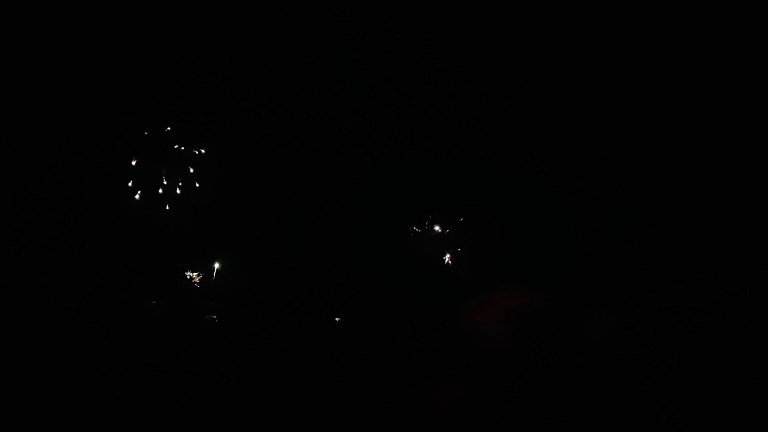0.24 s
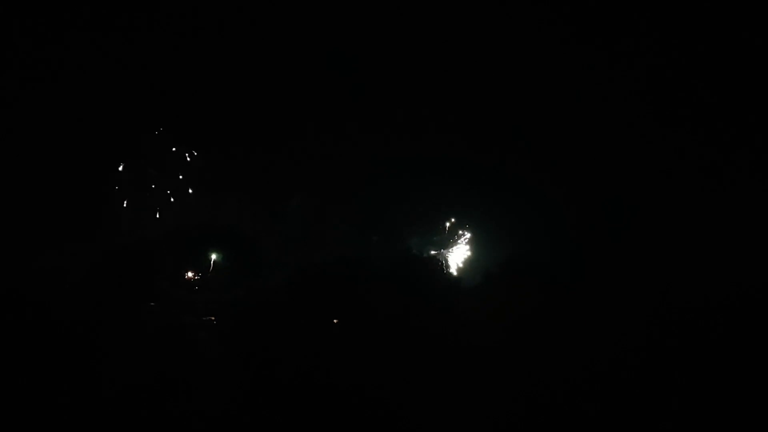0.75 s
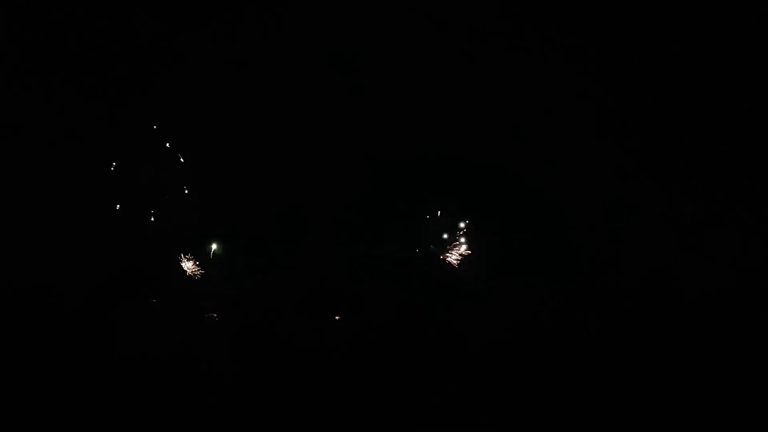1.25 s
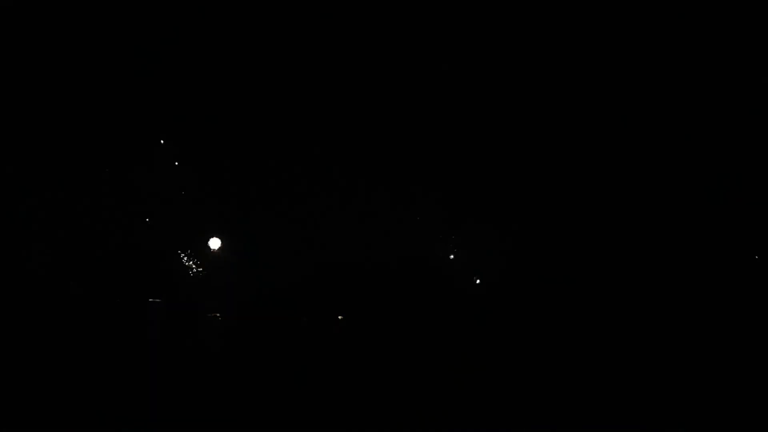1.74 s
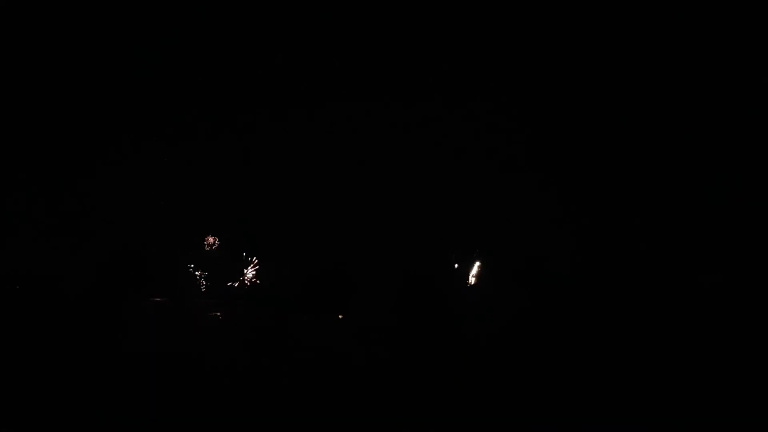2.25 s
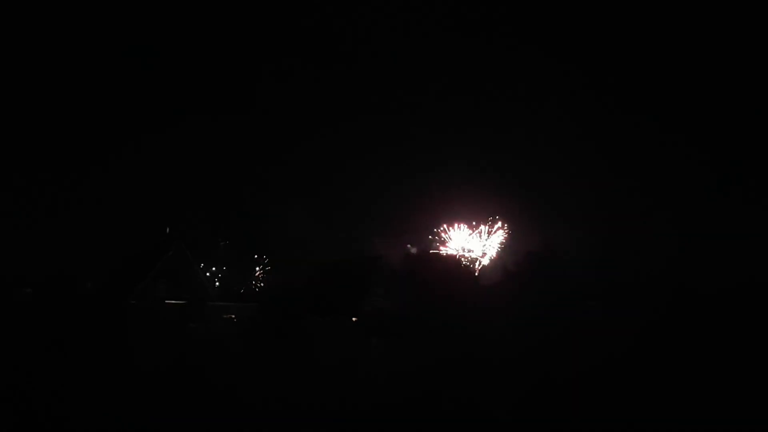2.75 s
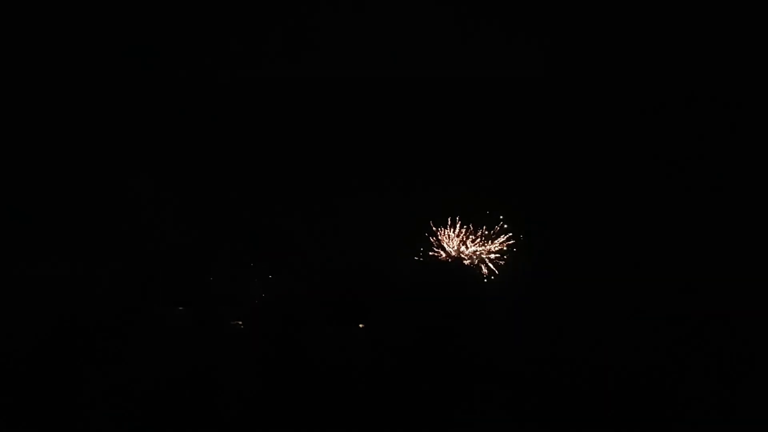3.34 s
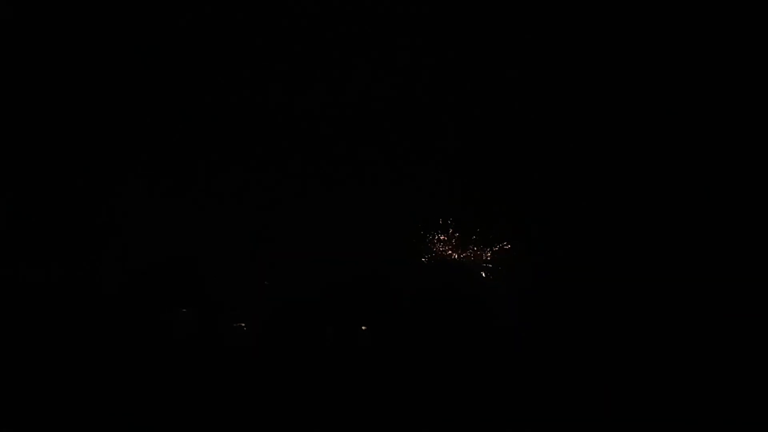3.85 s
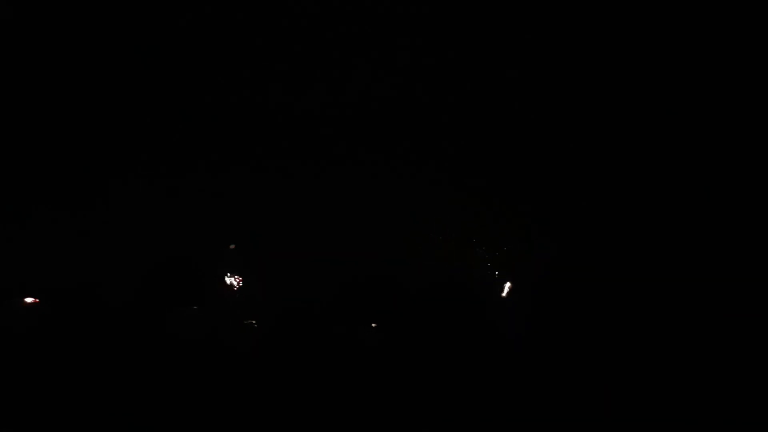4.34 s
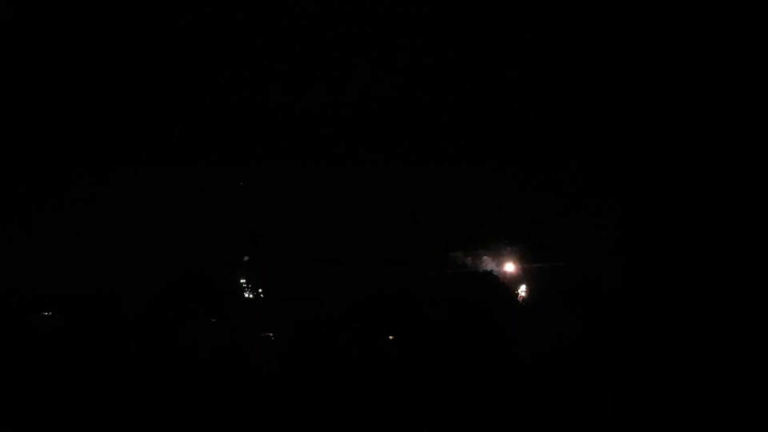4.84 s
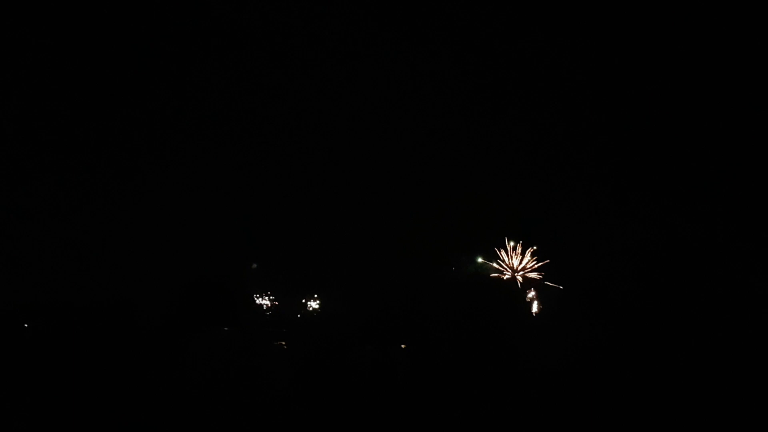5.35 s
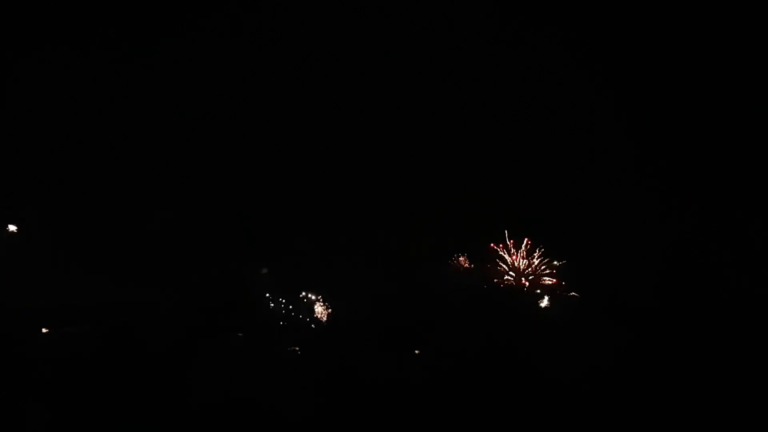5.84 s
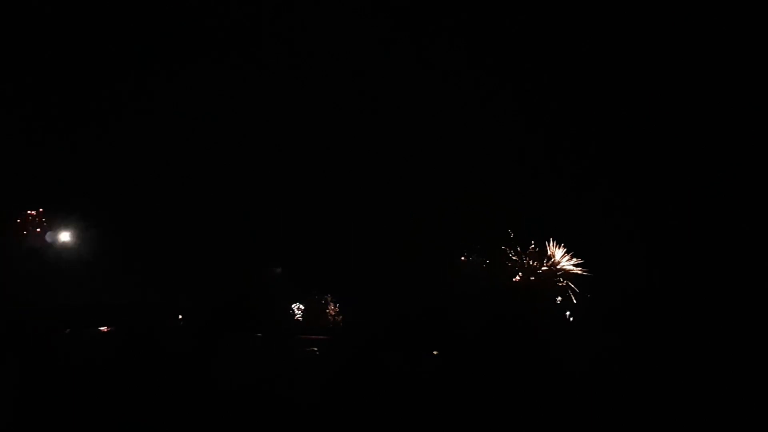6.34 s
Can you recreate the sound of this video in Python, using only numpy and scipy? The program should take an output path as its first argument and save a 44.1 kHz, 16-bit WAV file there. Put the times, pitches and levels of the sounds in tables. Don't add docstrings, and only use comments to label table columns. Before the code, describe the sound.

Fireworks and firecrackers go off all around a street at night, sharp overloading bangs slapping off houses over constant crackle and distant rumbling roar.

```python
import sys
import numpy as np
from scipy import signal
from scipy.fft import rfft, irfft, next_fast_len
from scipy.io import wavfile
from scipy.ndimage import map_coordinates

SR = 44100
rng = np.random.default_rng(int(sys.argv[2]) if len(sys.argv) > 2 else 0)


def generate_wav(sig):
    pcm = np.round(np.clip(np.atleast_2d(sig).T, -1, 1) * 32767).astype(np.int16)
    wavfile.write(sys.argv[1], SR, pcm)


def invert_db(x):
    u = np.asarray(x, float) / 20
    return 10 ** u


N = 290619

# t/s, peak level/dB, swing f/Hz, front level/dB re peak, left lag/ms
SHELLS = [(0.0142, -9.5, 440, -11, -0.44), (0.0895, -6, 400, -4.5, -0.16),
          (0.0994, -4.5, 408, -30.5, 0.037), (0.104, -1.5, 523, -6.5, 0.38), (0.4773, -20, 634, -20, 0.1),
          (1.1797, -4.5, 440, -4.5, -0.044), (1.2906, 1.4, 412, -16, 0.32), (1.7831, -8.5, 450, -18, -0.18),
          (2.0447, -15, 630, -5, -0.1), (2.3393, -0.2, 433, -15, 0.42), (2.8773, -24.5, 350, -4, 0.019),
          (3.2723, 2.5, 530, -5, 0.03), (3.395, -5.5, 514, -7, 0.044), (3.6844, -10, 117, -9.5, -0.083),
          (4.2065, -9, 350, -6.5, 0.38), (4.243, -8.5, 267, -10, 0.37), (4.5335, -11, 444, -8.5, 0.56),
          (4.8973, -16, 360, -12, 0.4), (5.3478, -7.5, 610, -24, 0.073), (5.7261, -3.5, 415, -1.5, 0.2),
          (5.9327, -8, 408, -5, -0.32), (6.0467, -8.5, 676, -16, 0.29), (6.4496, -9.5, 567, -10, 0.2),
          (6.5631, -11, 855, -6.5, 0.016)]
# t/s, peak level/dB, swing f/Hz, front level/dB re peak
WALL_SLAPS = [(0.152, -22, 480, -25), (1.1964, -26, 494, -11.5), (1.2093, -12.5, 506, -1.5),
              (1.2997, -17.5, 574, 3.5), (1.3226, -7.5, 650, -8.5), (1.3421, -9, 760, -8),
              (1.3558, -8, 460, -11), (1.8078, -24, 560, -8.5), (2.0737, -13.5, 547, -8),
              (2.3702, -8.5, 597, -16), (2.3759, -13, 392, -2), (2.4026, -8.5, 367, -4.5),
              (2.4102, -13.5, 520, -13.5), (2.4478, -14.5, 334, -0.5), (2.4695, -11.5, 455, -5.5),
              (2.495, -14, 470, -24.5), (2.5172, -13.5, 530, -21), (3.3189, -15.5, 587, -3),
              (3.3328, -9, 383, -2.5), (3.3414, -14, 460, -11), (3.4431, -16.5, 715, -1),
              (3.6942, -18, 197, -1), (4.227, -13.5, 504, -29), (5.361, -13.5, 494, -11),
              (5.7457, -19.5, 434, 5), (5.7653, -14, 494, -3), (5.7802, -9, 690, -21),
              (6.0658, -14.5, 535, -4.5), (6.4814, -13, 617, -17), (6.4955, -14.5, 505, -16)]
# t/s, peak level/dB, swing f/Hz, front level/dB re peak
CRACKERS = [(0.8439, -16, 573, -5.5), (0.9875, -25.5, 533, 5.5), (0.9924, -19.5, 670, -3),
            (1.0162, -23, 900, 1), (1.5207, -26, 496, -9), (1.7103, -18, 850, -11.5),
            (1.9451, -26.5, 370, -29), (1.986, -18.5, 644, -14), (2.158, -16.5, 580, -10),
            (2.2781, -14.5, 613, -7), (4.276, -23.5, 494, 4), (3.1783, -16, 735, -14),
            (3.221, -14, 695, -4), (3.234, -15.5, 850, -6), (3.2582, -19, 610, -21), (3.6, -22, 477, -14),
            (3.7688, -25.5, 520, -2.5), (4.473, -19, 295, -13), (4.4986, -19.5, 373, -4),
            (4.603, -19, 566, 1.5), (4.7994, -21, 885, -37), (5.181, -21.5, 361, -21),
            (5.2801, -16, 645, -9), (5.6453, -15.5, 315, -11), (5.6526, -20, 426, -4),
            (5.9789, -16.5, 577, -38), (6.1153, -23, 644, -3), (6.13, -23.5, 695, -11),
            (6.1882, -20.5, 415, -10), (6.3692, -19.5, 630, -11)]
# t/s, peak level/dB, swing f/Hz, front level/dB re peak
FAR_CRACKERS = [(0.033, -19, 476, -12), (0.1662, -18, 405, -7), (0.2222, -20.5, 414, -12),
                (0.2539, -26.5, 416, -12), (0.8269, -21, 626, -9), (0.9137, -21.9, 346, -8),
                (0.9383, -23, 339, -12), (1.409, -25, 437, -8), (1.4418, -27, 363, -11),
                (1.5553, -23.4, 518, -12.5), (1.5843, -28, 399, -11), (1.662, -33, 646, -11),
                (1.9221, -26.6, 757, -12), (1.9712, -22, 494, -10), (2.2061, -18, 695, -10),
                (2.2117, -22.5, 671, -11), (2.6648, -19.5, 600, -9), (2.694, -22, 650, -11),
                (2.8821, -22, 940, -8.5), (2.9726, -30.7, 348, -13), (3.018, -28.5, 493, -11),
                (3.0556, -30, 407, -13), (3.093, -26.0, 634, -10), (3.1113, -25.2, 559, -10),
                (3.1402, -20, 723, -12), (3.211, -13.5, 818, -10), (3.8974, -34, 331, -10),
                (3.9244, -32.9, 831, -9), (4.0299, -27.5, 280, -7), (4.346, -18, 387, -10),
                (4.355, -16, 476, -9), (4.4174, -25, 388, -10), (4.5574, -18.3, 395, -13),
                (4.5857, -23.5, 592, -11), (4.91, -20.5, 815, -13), (4.9263, -20, 390, -9.5),
                (4.9667, -26.5, 490, -6), (5.0718, -26.5, 290, -8), (5.0882, -34, 378, -10),
                (5.2112, -27.8, 665, -8), (5.3742, -18, 550, -11), (5.3897, -17.2, 630, -10.5),
                (5.4901, -18.5, 545, -9), (6.1757, -32.0, 907, -10), (6.236, -20.5, 448, -10.5),
                (6.3553, -28, 413, -8), (6.409, -26, 590, -9)]
# t/s, peak level/dB, swing f/Hz, front level/dB re peak
HILL_ROLLS = [
    (3.727, -19, 128.5, -30),
    (3.765, -21, 117, -28),
    (3.803, -31.5, 85, -28),
    (3.845, -29.5, 79.6, -30),
    (3.939, -32, 90, -30),
    (4.0, -37, 85, -29),
    (4.068, -31, 74.5, -30),
    (4.151, -34.5, 100, -29),
    (4.28, -25.5, 131, -31),
]
# f/Hz, level/dB
SWING_AIR = [(20, 4), (2500, -3.5), (5000, -14), (8000, -47.5), (16000, -68)]
# f/Hz, level/dB
FRONT_COLOUR = [(400, -7), (900, 9), (2000, 2.5), (4000, -9.5), (6500, -25), (9000, -64.5), (16000, -70)]


def blasts(echo):
    far = FAR_CRACKERS + HILL_ROLLS
    street = scattered(WALL_SLAPS + CRACKERS + far, lag_ms=0.22, spread_ms=0.28)
    s, db, hz, front_db, lag_ms = np.vstack([SHELLS, street]).T
    counts = [len(SHELLS), len(WALL_SLAPS), len(CRACKERS), len(far)]
    echo_db = [-2.5, -0.5, 2.5, -2.1]
    db = db + echo * np.repeat(echo_db, counts)

    def swing(t):
        cycles = t * hz[:, None]
        rise = np.clip((cycles + 0.6) / 0.16, 0, 1)
        late = np.maximum(cycles, 0)
        fall = 0.66 * invert_db(-15 * late ** 2) + 0.13 * invert_db(-8 * late)
        steep = np.tanh(1.73 * np.cos(2 * np.pi * cycles))
        return -invert_db(db + 4.5)[:, None] * steep * rise * fall

    def crack(t):
        t = t + 0.234 / hz[:, None]
        step = 0.72 * np.exp(-(t / 0.00005) ** 2)
        step = step + 0.22 * burst(t, t60=0.005)
        trail = 0.27 * (1 - echo) * burst(t, t60=0.035)
        return invert_db(db + front_db + 14.5)[:, None] * (step + trail)

    fronts = at_both_mics(s, lag_ms, crack, shadow_db=4.0, size=900)
    swings = at_both_mics(s, lag_ms, swing, shadow_db=1.5, size=1900)
    return coloured(swings, SWING_AIR) + coloured(fronts, FRONT_COLOUR)


# t/s, peak level/dB, left lag/ms
EDGES = [(0.0895, -7.5, -0.27), (0.098, -22.5, -0.3), (0.1045, -8.5, -0.33), (1.1806, -27.5, -0.14),
         (1.2912, -15, 0.14), (2.3395, -12, 0.14), (2.376, -20.5, 0.095), (2.4015, -13, 0.21),
         (2.41, -18, 0.15), (2.4317, -19.5, -0.25), (2.448, -18, 0.6), (2.469, -13.5, 0.25),
         (2.503, -21, 0.019), (2.514, -26, 0.02), (2.6645, -31.5, -0.55), (3.015, -37.5, 0.13),
         (3.2708, -10.5, 0.01), (3.291, -14, 0.01), (3.3109, -17.5, -0.14), (3.3946, -19.5, 0.41),
         (3.795, -38, 0.4), (3.83, -45, 0.2), (3.846, -44, 0.26), (3.925, -45, 0.2), (3.972, -48, 0.3),
         (4.023, -47, 0.2), (4.11, -49, 0.2), (4.2088, -25.5, -0.12), (4.2456, -30, 0.36),
         (4.5902, -34, -0.02), (5.7251, -12.5, 0.01), (5.7465, -28, -0.49), (5.7658, -16, 0.014)]
# t/s, peak level/dB
STAR_STRING = [(0.5516, -53.1), (0.5634, -51), (0.5718, -48.0), (0.5794, -34.5), (0.586, -45),
               (0.5919, -44.5), (0.6016, -53.0), (0.6116, -32), (0.6214, -48.7), (0.6298, -42),
               (0.6451, -44), (0.6496, -45), (0.6568, -40.6), (0.6682, -41), (0.6734, -36), (0.6799, -35.8),
               (0.686, -41.5), (0.6932, -38.7), (0.6977, -40), (0.7059, -38.6), (0.7112, -40.5),
               (0.7205, -40.0), (0.7292, -33), (0.7351, -39), (0.7404, -38), (0.7472, -33.5), (0.7547, -45),
               (0.7637, -36.5), (0.7722, -37.1), (0.7764, -31), (0.7815, -36.5), (0.7958, -28.5),
               (0.8089, -29.5), (0.8157, -34), (0.822, -29.6), (0.8311, -30.7), (0.8375, -30),
               (0.8501, -34), (0.8557, -35.7), (0.8655, -30.8), (0.8783, -29), (0.8937, -34.0),
               (0.8982, -24), (0.9049, -33.0), (0.9161, -35.5), (0.9217, -35.6), (0.9337, -35.4),
               (0.9399, -30), (0.9492, -32), (0.9633, -23.5), (0.9753, -37.5), (0.9871, -35.4),
               (1.0084, -38.7), (1.0161, -27.5), (1.026, -37.9), (1.0323, -27.2), (1.0396, -40),
               (1.0488, -40)]
# t/s, peak level/dB
SPARKS = [(2.4214, -38.8), (2.4261, -38), (2.4368, -40.1), (2.4596, -37.6), (2.4723, -37), (2.4772, -38.5),
          (2.4877, -40.7), (2.4922, -40.5), (2.5066, -40), (2.5106, -39), (2.5217, -44.3)]
# f/Hz, level/dB
EDGE_COLOUR = [(600, -19), (2500, 11.5), (7500, 2.5), (9500, -13), (16000, -28.5)]
# f/Hz, level/dB
STAR_COLOUR = [(600, -12), (2500, 12.5), (5500, 3.5), (8000, 3), (9200, -13), (16000, -24)]
# f/Hz, level/dB
AIRY_TOP = [(5000, -48.5), (9000, -17), (13000, -15.5), (16000, -18)]


def snaps(spit):
    def clicks(rows, gain_db, spectrum):
        s, db, lag_ms = np.transpose(rows)
        db = db + gain_db

        def click(t):
            return invert_db(db - 7.5)[:, None] * (np.exp(-(t / 0.00003) ** 2) + spit * burst(t, t60=0.0082))

        def close_click(t):
            return invert_db(2.26 * (db + 13.5))[:, None] * click(t)

        body = at_both_mics(s, lag_ms, click, shadow_db=2.0, size=700)
        top = at_both_mics(s, lag_ms, close_click, shadow_db=8.0, size=700)
        return coloured(body, spectrum) + coloured(top, AIRY_TOP)

    def overhead(rows):
        return scattered(rows, lag_ms=-0.062, spread_ms=0.34)

    edges = clicks(EDGES, 0, EDGE_COLOUR)
    string = clicks(overhead(STAR_STRING), 6, STAR_COLOUR)
    return edges + string + clicks(overhead(SPARKS), 13, STAR_COLOUR)


# t/s, level/dB, f/Hz, t60/s
TUBE_RING = [
    (0.478, -27.5, 1880, 0.033),
]


def tube():
    s, db, hz, t60 = np.transpose(TUBE_RING)

    def ring(t):
        return (t > 0) * invert_db(db - 60 * np.abs(t) / t60) * np.sin(2 * np.pi * hz * t)

    return at_both_mics(s - 0.0015, 0 * s, ring, shadow_db=6, size=900)


# peak t/s, level/dB, swell/s, fade/s
RUNS = [
    (1.0, -43, 0.34, .3),
    (2.24, -35.5, 0.27, .25),
    (2.78, -49.5, .4, .3),
    (3.17, -36, 0.18, 0.22),
    (4.45, -43, 0.31, 0.28),
    (5.32, -43, 0.35, .5),
]
# f/Hz, level/dB
RATTLE_COLOUR = [(1000, -29), (1700, -2.5), (2300, 6), (2800, -6.5), (4200, -33.5)]


def rattle():
    level_db = swells(np.c_[RUNS, np.zeros(len(RUNS))], -70)
    return invert_db(level_db) * pops(220, 2.7, RATTLE_COLOUR, blur=0.66, alike=0.5, pan_db=-2.0)


# peak t/s, level/dB, swell/s, fade/s (over 20 dB), big shells level/dB re crackers
VOLLEYS = [(0.01, -24, 0.13, 0.16, -18), (.12, -23.5, 0.053, 0.29, -16.5), (.85, -32, 0.3, 2.6, -19),
           (1.21, -22.5, 0.1, 0.22, -16.5), (1.8, -37.5, 0.21, 0.27, -18), (2.1, -29, 0.35, 0.75, -27),
           (2.45, -24.5, 0.14, 0.48, -24), (3.29, -25, 0.33, 0.42, -29.5), (3.3, -41.5, .03, .5, 2),
           (3.72, -26, 0.068, 0.13, -9.5), (3.95, -41, 0.64, 1.95, 1.5), (4.225, -23.5, 0.029, 0.42, -8),
           (4.6, -26.5, 0.42, 0.23, -9), (5.0, -36, 0.97, 0.28, -9), (5.42, -27.5, 0.53, 0.79, -8.5),
           (5.78, -21.5, 0.18, 0.1, -7), (6.1, -29, 0.36, 0.63, -15.5), (6.45, -35.5, 0.27, .5, -8),
           (6.59, -22, 0.22, .3, -11)]
# peak t/s, level/dB, swell/s, fade/s (over 20 dB), top left by the air level/dB
SHOWERS = [(0.01, -28, 0.058, 0.14, -15), (.12, -32, 0.022, 0.45, -5.5), (.75, -36.5, 0.15, 2.1, -14),
           (.95, -31.5, 0.62, 0.83, -14), (1.2, -24.5, 0.026, 0.16, -16), (1.33, -27, 0.19, 0.13, -17.5),
           (1.53, -48, 0.087, 0.28, -22), (1.72, -40.5, 0.069, 0.34, -21), (2.15, -31, 0.32, 2.2, -17.5),
           (2.42, -24.5, 0.088, 0.19, -24.5), (2.72, -45, .3, 0.36, -10), (3.13, -32.5, 0.074, 0.92, -16),
           (3.24, -18.5, 0.23, 0.25, -20), (3.42, -38.5, .2, 0.39, -9), (3.72, -33, 0.049, 0.21, -27),
           (4.04, -43.5, 0.4, 0.74, -37), (4.215, -32, 0.018, 1.4, -25.5), (4.59, -28, 0.27, 0.084, -26),
           (5.33, -31, 0.53, 1.52, -24), (5.55, -41.5, 1, 2.3, -11), (5.765, -20.5, .09, 0.12, -17),
           (6.1, -41.5, 0.4, 0.45, -22), (6.45, -38, 0.38, 0.87, -11), (6.59, -30, 0.41, .3, -33)]
# level/dB of the far town's rumble, thud, crackle, sizzle, and of a faint steady hiss
FLOOR_DB = [-76, -48, -71, -85.5, -63.5]
# f/Hz, level/dB
RUMBLE = [(20, -14), (50, 18), (120, 23.5), (200, 21), (350, -43.5)]
# f/Hz, level/dB
THUD = [(120, -31.5), (200, -11.5), (300, 2), (400, -2), (650, 0), (1000, -8), (1500, -16.5), (3000, -79.5)]
# f/Hz, level/dB
CRACKLE = [(500, -14), (900, -3.5), (1400, 0), (2300, -1), (3200, -13.5), (4600, -17.5), (7000, -45),
           (9000, -68.5)]
# f/Hz, level/dB
SIZZLE = [(2800, -8.5), (4500, 2.5), (6000, -2), (8300, -10.5), (9000, -26.5), (12000, -48), (16000, -47.5)]
# f/Hz, level/dB
HISS = [(6000, -48), (9000, -24), (12000, -17), (15700, -16), (16100, -56.5)]


def barrage():
    rumble_town, thud_town, crackle_town, sizzle_town, hiss_floor = FLOOR_DB
    rumble_db = swells(VOLLEYS, rumble_town, lingers=1.09, layer=0.96)
    thud_db = swells(VOLLEYS, thud_town)
    crackle_db = swells(SHOWERS, crackle_town)
    sizzle_db = swells(SHOWERS, sizzle_town, lingers=0.6, layer=0.99)
    hiss_db = 1.13 * swells(SHOWERS, hiss_floor, lingers=0.81, layer=1) - 23.5
    roar = invert_db(rumble_db) * pops(90, 2.6, RUMBLE, blur=1.2, alike=0.95, pan_db=6.5)
    roar += invert_db(thud_db) * pops(250, 4.3, THUD, blur=3.2, alike=0.94, pan_db=-1.6)
    roar += invert_db(crackle_db) * pops(600, 3.55, CRACKLE, blur=1.54, alike=0.54, pan_db=-7.5)
    roar += invert_db(sizzle_db) * pops(500, 2.3, SIZZLE, blur=2.1, alike=0.052, pan_db=-3.0)
    roar += invert_db(hiss_db) * pops(300, 3, HISS, blur=2.2, alike=0.4, pan_db=-0.5)
    return roar


# t/s, level/dB, f/Hz
ROCKET = [(3.75, -71, 3220), (4.02, -63, 3130), (4.1, -56, 3076), (4.17, -50.5, 2963), (4.5, -58, 3006),
          (4.7, -53, 3100), (4.86, -52, 3024), (5.05, -53, 2950), (5.3, -59, 3070), (5.62, -43, 3050),
          (5.75, -68, 3010)]
# t/s, level/dB, f/Hz
FENCE = [
    (.295, -58, 934),
    (.31, -27.5, 933),
    (.325, -36, 900),
    (.345, -80, 930),
]


def whistles():
    t = np.arange(N) / SR
    rocket_db, rocket_hz = curves(ROCKET)
    turn = 2 * np.pi * np.cumsum(rocket_hz) / SR
    a, b = unit(filtered(rng.standard_normal((2, 2, N)), lambda hz: 1 / (1 + (hz / 145) ** 4)))
    waver_db = map_coordinates(rng.standard_normal(99), [t * 12])
    rocket = invert_db(rocket_db + waver_db) * ((t > 3.75) & (t < 5.75))
    rocket = rocket * (a * np.cos(turn) + b * np.sin(turn))
    fence_db, fence_hz = curves(FENCE)
    fence = invert_db(fence_db) * (fence_db > -69) * np.sin(2 * np.pi * np.cumsum(fence_hz) / SR)
    return rocket + fence


# f/Hz, t60/s
STREET_DECAY = [(100, 0.64), (500, 0.39), (3000, 0.62), (7000, 0.33), (14000, 0.61)]
# f/Hz, level/dB
WALL_COLOUR = [(30, -13), (90, -2), (300, 0), (1400, -1.5), (2400, -0.8), (7500, -0.5), (11000, -3)]


def houses(x):
    out, step = np.zeros((2, N + 2 * SR)), SR // 3
    for start in range(0, N, step):
        hz, t, z = signal.stft(rng.standard_normal((2, SR // 2)), SR, nperseg=256)
        lumps = invert_db(0.94 * rng.standard_normal(len(t))) * (1 - np.exp(-t / 0.0041))
        decay = invert_db(-60 * t / along(STREET_DECAY, hz)[:, None])
        tail = signal.istft(z * lumps * decay, SR, nperseg=256)[1]
        tail[1] += 1.7 * tail[0]
        tail = tail / np.linalg.norm(tail, axis=1)[:, None]
        wet = signal.fftconvolve(x[None, start:start + step], tail, axes=1)
        out[:, start:start + wet.shape[1]] += wet
    return coloured(out[:, :N], WALL_COLOUR)


def pops(per_s, spread_db, spectrum, blur, alike, pan_db):
    count = int(per_s * N / SR)
    when, way, size = rng.random((3, count))
    sizes = invert_db(-spread_db * np.log(size + 0.02))[:, None]
    lag_ms = np.where(way < 0.7, 0.3, -0.15) + 0.075 * rng.standard_normal(count)

    def pop(t):
        return sizes * np.exp(-(t / 0.00003) ** 2)

    direct = at_both_mics(when * N / SR, lag_ms, pop, shadow_db=1.5, size=30)
    common, own = rng.standard_normal(N + 13), rng.standard_normal((2, N))
    haze = np.sqrt(alike) * np.array([common[:N], common[13:]]) + np.sqrt(1 - alike) * own
    flicker = map_coordinates(rng.standard_normal(200), [np.arange(N) * 25 / SR])
    haze = haze * invert_db(2.45 * flicker + pan_db * np.array([[0.5], [-0.5]]))
    return unit(coloured(unit(direct) + blur * unit(haze), spectrum))


def swells(rows, floor_db, lingers=1, layer=0):
    s, db, rise_s, fade_s, other_db = np.transpose(rows)[:, :, None]
    coarse = np.arange(0, N, 64)
    t = coarse / SR - s
    drop_db = 20 * np.maximum(-t / rise_s, t / (lingers * fade_s))
    power = invert_db(floor_db) ** 2 + (invert_db(db + layer * other_db - drop_db) ** 2).sum(0)
    return np.interp(np.arange(N), coarse, 10 * np.log10(power))


def burst(t, t60):
    return np.clip(t / 0.00045, 0, 1) * invert_db(-60 * np.maximum(t, 0) / t60) * rng.standard_normal(t.shape)


def scattered(rows, lag_ms, spread_ms):
    return np.c_[rows, lag_ms + spread_ms * np.clip(rng.standard_normal(len(rows)), -1.5, 1.5)]


def at_both_mics(s, lag_ms, shape, shadow_db, size):
    out = np.zeros((2, N))
    for mic, side in enumerate((0.5, -0.5)):
        arrive = (s + side * lag_ms / 1000)[:, None]
        index = np.round(s * SR).astype(int)[:, None] + np.arange(-size // 3, size)
        wave = invert_db(-side * shadow_db * (lag_ms + 0.78))[:, None] * shape(index / SR - arrive)
        bins = np.clip(index + 1, 0, N + 1)
        out[mic] = np.bincount(bins.ravel(), wave.ravel(), N + 2)[1:-1]
    return out


def unit(x):
    return x / np.sqrt(np.mean(x ** 2) + 1e-20)


def along(points, hz):
    f, v = np.transpose(points)
    return np.interp(np.log(hz + 1), np.log(f + 1), v)


def curves(rows):
    s, *cols = np.transpose(rows)
    return [np.interp(np.arange(N) / SR, s, c) for c in cols]


def filtered(x, response):
    m = next_fast_len(N + 8192)
    return irfft(rfft(x, m) * response(np.fft.rfftfreq(m, 1 / SR)), m)[..., :N]


def coloured(x, spectrum):
    return filtered(x, lambda hz: invert_db(along(spectrum, hz)))


def scene():
    near = blasts(echo=0) + snaps(spit=1.4) + tube()
    to_walls = blasts(echo=1) + 3.8 * snaps(spit=0)
    echoes = invert_db(-5.0) * houses(to_walls.mean(0))
    far = invert_db(1.5) * barrage() + rattle() + whistles()
    return near + echoes + far


def band_limit(x):
    return signal.sosfilt(signal.butter(12, 16590, fs=SR, output="sos"), x)


def record(dry):
    heard = filtered(dry, lambda hz: (1j * hz / (45 + 1j * hz)) ** 2)
    clipped = heard / (1 + np.abs(heard / 0.99) ** 8) ** (1 / 8)
    faded = clipped * np.clip((N - np.arange(N)) / 150, 0, 1)
    mix = filtered(faded, lambda hz: hz < 16600)
    return band_limit(mix)


dry = scene()
out = record(dry)
generate_wav(out)
```